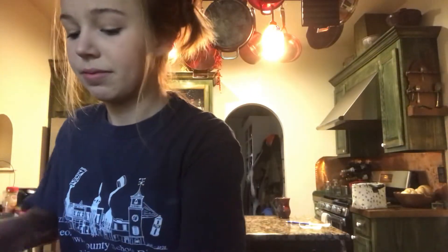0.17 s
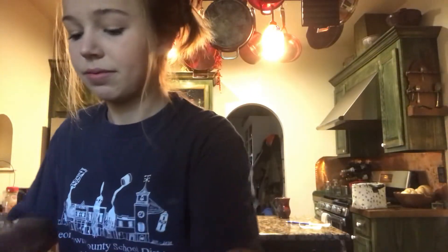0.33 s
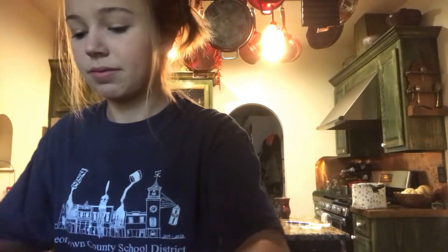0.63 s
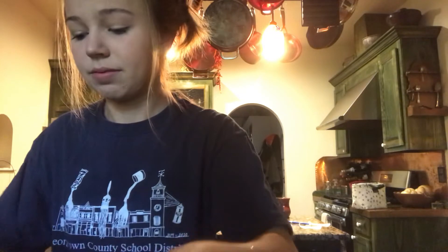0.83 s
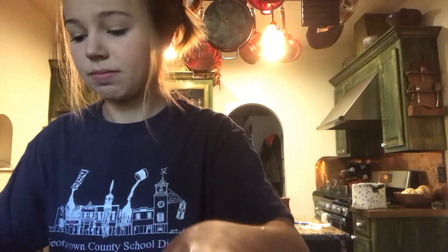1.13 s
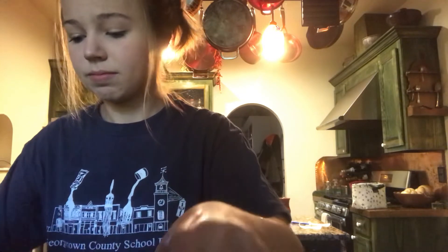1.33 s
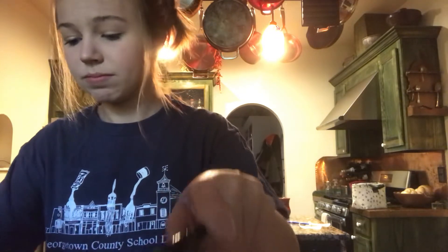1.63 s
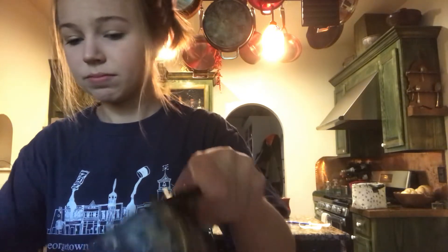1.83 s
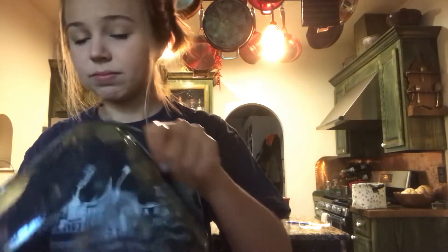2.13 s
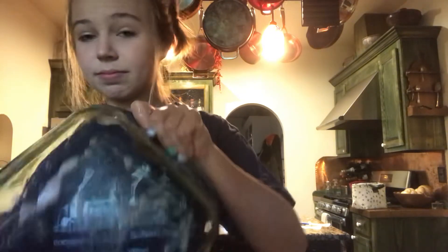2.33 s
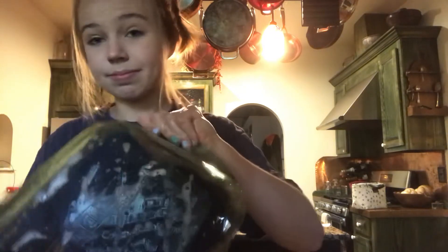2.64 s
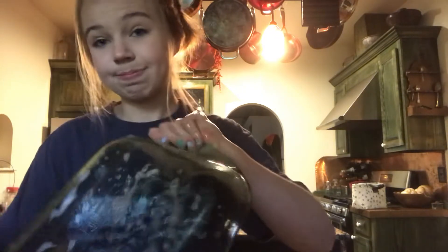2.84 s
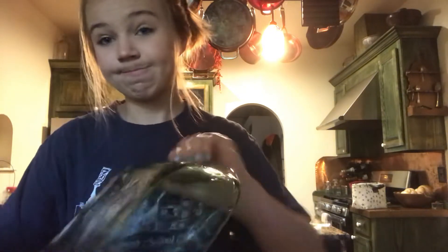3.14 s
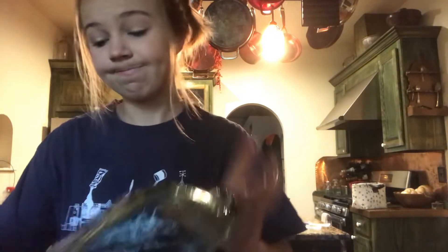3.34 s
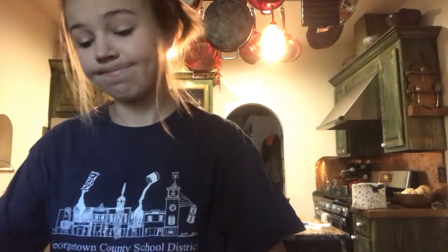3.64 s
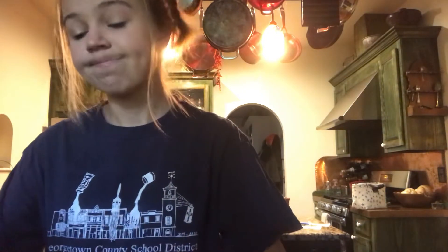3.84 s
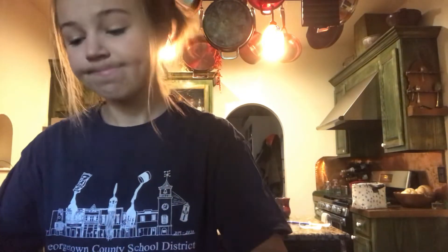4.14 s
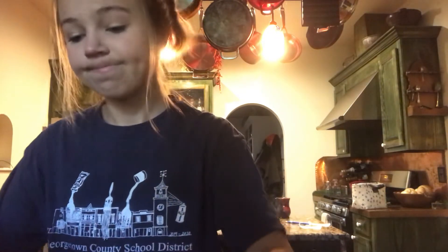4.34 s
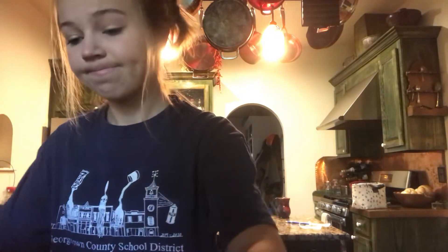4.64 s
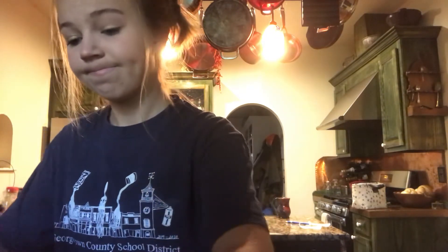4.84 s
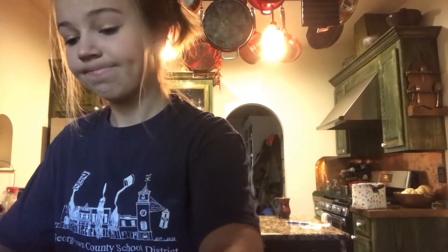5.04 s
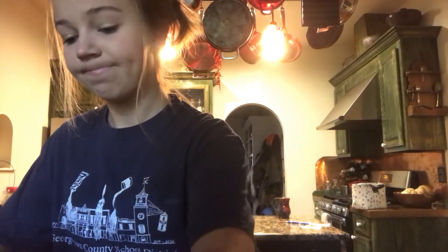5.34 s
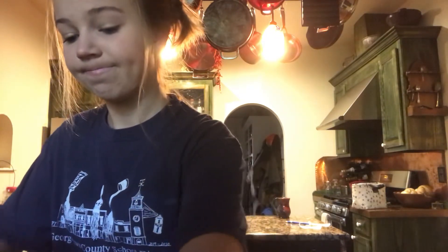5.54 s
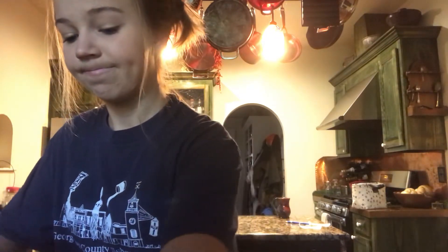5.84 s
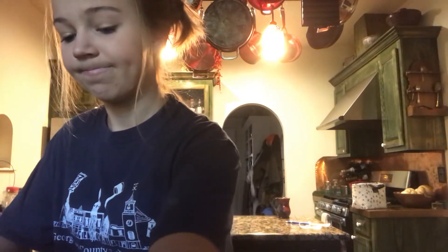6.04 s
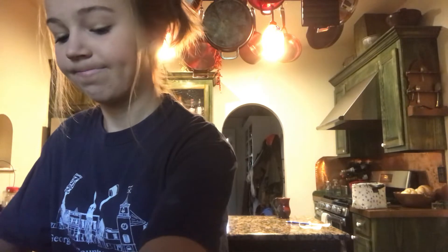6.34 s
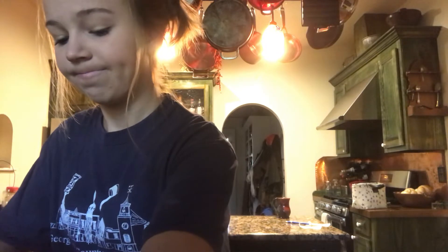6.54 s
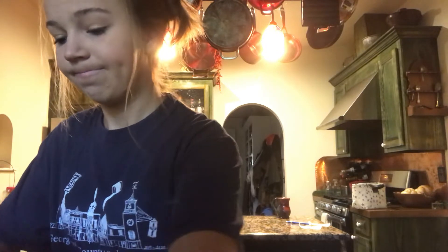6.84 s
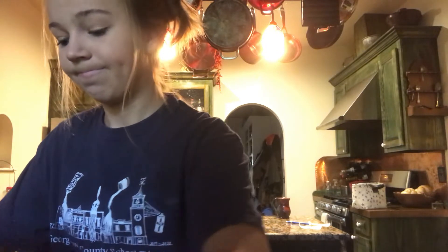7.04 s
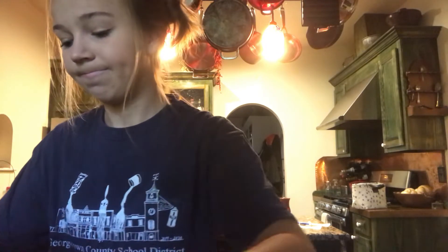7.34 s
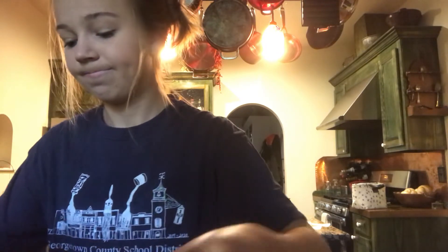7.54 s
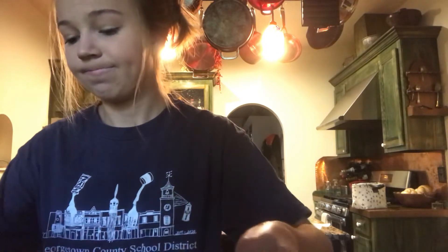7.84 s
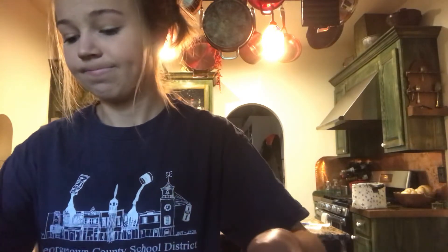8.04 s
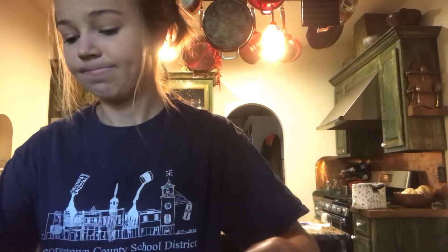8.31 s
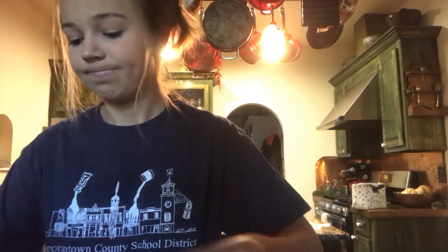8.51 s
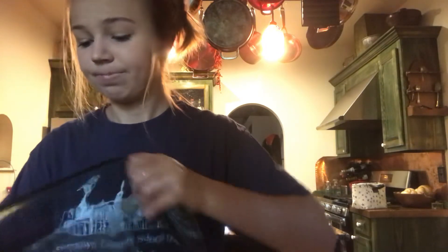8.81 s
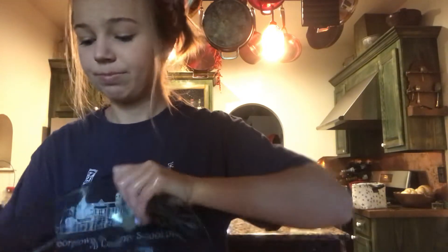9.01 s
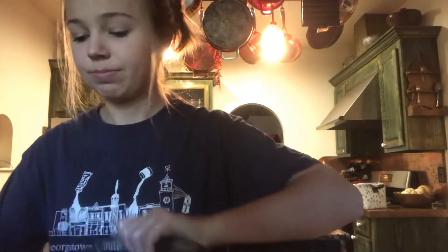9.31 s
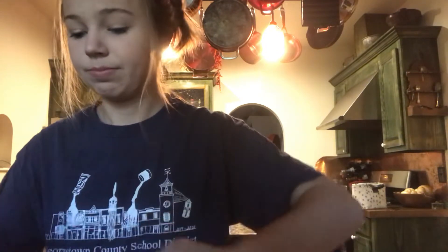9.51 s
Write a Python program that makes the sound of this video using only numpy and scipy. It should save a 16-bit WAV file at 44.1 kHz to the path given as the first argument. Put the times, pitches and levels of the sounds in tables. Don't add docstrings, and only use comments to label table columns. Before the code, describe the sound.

Washing a glass baking dish under a running tap: hissing water, small gushes, bright drips, and a cluster of hard clunks on the metal basin.

```python
import sys
import numpy as np
from scipy import signal
from scipy.io import wavfile
from scipy.ndimage import uniform_filter1d

SR = 44100
rng = np.random.default_rng(int(sys.argv[2]) if len(sys.argv) > 2 else 0)


def invert_db(x):
    u = np.asarray(x, float) / 20
    return 10 ** u


def digitize_waveform(pressure):
    field = np.atleast_2d(pressure).T
    bounded = np.clip(field, -1, 1)
    quanta = np.round(bounded * 32767).astype(np.int16)
    wavfile.write(sys.argv[1], SR, quanta)


N = 426447

# f/Hz, level/dB, t60/s
SET_DOWN_MODES = [(82.4, -37, 0.54), (222, -17, 0.057), (269.5, -44.5, 0.67), (351, -38, 0.33),
                  (367, -18.5, 0.054), (439, -36, 0.19), (473, -31, 0.17), (548, -39, 0.18),
                  (650, -30.5, .06), (715, -42, 0.35), (796, -38, 0.054), (934, -34, 0.15), (960, -42, 0.3),
                  (1124, -27, 0.063), (1166, -40, .17), (1213, -22, 0.058), (1400, -25, 0.07),
                  (1673, -24, 0.06), (1750, -35, .14), (2612, -31, 0.097)]
PUT_BACK_MODES = [(86.5, -40.5, 0.46), (385, -52, .2), (480, -42, 0.21), (580, -35, 0.092),
                  (780, -51, 0.14), (1038, -39, 0.15), (1086, -38, 0.19), (1390, -40, 0.09),
                  (1440, -47, 0.26), (1470, -25, 0.1), (1620, -31, 0.072), (1790, -22, 0.03),
                  (2810, -23.5, 0.041), (3095, -25, 0.092), (3600, -26.5, 0.07), (3600, -42, 0.11)]
NUDGE_MODES = [(194, -36, 0.18), (257, -35, 0.17), (350, -23.5, 0.07), (484, -53, 0.14), (573, -47, 0.22),
               (740, -36.5, 0.51), (870, -23.5, 0.06), (1065, -39, 0.16), (1180, -44, 0.11),
               (1300, -52, 0.081), (1430, -63, 0.2), (1450, -46, .08), (1534, -52, 0.4), (1860, -32, 0.063),
               (2800, -41, 0.077)]
BANG_MODES = [(78, -28, 0.12), (233, -6, 0.026), (265, -35, 0.2), (402, -29, 0.26), (449, -21.5, 0.19),
              (485, -9.5, 0.07), (620, -32, 0.15), (735, -18.5, 0.54), (888, -19, 0.14), (1090, -43, .25),
              (1160, -15, 0.064), (1270, -7.5, 0.032), (1520, -27, 0.44), (1826, -37, 0.62),
              (1850, -12, 0.035), (2695, -17.5, 0.051), (2812, -32, 0.18), (3310, -24.5, 0.075)]
REBOUND_MODES = [(172, -32, 0.043), (400, -52, .2), (449, -33, 0.12), (485, -19.5, 0.12), (590, -46, .3),
                 (733, -37.5, 0.51), (855, -39, 0.18), (900, -29, 0.081), (1020, -49, 0.37),
                 (1230, -24.5, 0.075), (1400, -39, .14), (1710, -45, .18), (1890, -30, 0.11),
                 (1854, -41, 0.64), (2385, -38, 0.14)]
SETTLE_MODES = [(382, -47, 0.52), (449, -38, 0.12), (490, -21, 0.12), (590, -51, 0.27), (720, -29, 0.072),
                (890, -34, 0.1), (910, -39, 0.21), (1036, -54, 0.19), (1153, -41, 0.26), (1246, -35, 0.08),
                (1400, -49, 0.15), (1430, -54, 0.46), (1688, -49, 0.089), (1826, -43, 0.27),
                (3980, -44, 0.21)]
SCRUB_A_MODES = [(261, -41.5, 0.26), (394, -44, 0.39), (448, -27.5, 0.17), (486, -17, 0.076),
                 (556, -36, 0.22), (654, -44, 0.33), (735, -44, 0.26), (830, -9.5, 0.018), (950, -34, .1),
                 (1110, -40, 0.2), (1142, -39, 0.11), (1220, -13, 0.038), (1450, -25, 0.051),
                 (1680, -30, 0.059), (1750, -48, 0.13), (2377, -42, 0.15), (2540, -42, 0.12),
                 (2692, -52, 0.2), (2803, -40, 0.087)]
SCRUB_B_MODES = [(261, -47, 0.22), (397, -44, 0.23), (448, -31.5, 0.19), (487, -22.5, 0.086),
                 (566, -44, 0.23), (705, -48, 0.6), (823, -26.5, 0.044), (1088, -50, .25),
                 (1200, -47, 0.37), (1235, -22.5, 0.026), (1410, -50, .12), (1520, -45, .45),
                 (1680, -43, 0.2), (2370, -50, .12), (2610, -49, .08), (2800, -38.5, 0.14)]
SCRUB_C_MODES = [(256, -47, 0.26), (399, -38, 0.25), (445, -27.5, 0.18), (479, -14.5, 0.053),
                 (518, -36, .12), (735, -38.5, 0.53), (818, -21.5, 0.071), (934, -22, 0.057),
                 (1084, -51, .25), (1197, -10.5, 0.039), (1227, -38, .14), (1390, -30, 0.067),
                 (1523, -35, 0.34), (1660, -24.5, 0.13), (2400, -43, 0.11), (2520, -43, .15),
                 (2670, -42, .07), (2800, -26, 0.16), (3070, -38, 0.13), (3580, -38, 0.16)]
# t/s, contact/s, free ringing until damped/s, clatter level/dB, clatter t60/s
KNOCKS = [
    (0.647, 0.0012, 0.36, -38.5, 0.45),
    (3.733, 0.0014, .3, -35.5, 0.24),
    (4.601, 0.0019, 0.18, -35.5, 0.36),
    (4.8149, 0.0016, 0.089, -27, 0.3),
    (4.984, 0.0011, 0.17, -37, 0.15),
    (5.027, 0.002, 0.06, -39.5, 0.39),
    (5.48, 0.0019, .3, -34, 0.16),
    (6.0512, 0.00092, 0.33, -45, 0.42),
    (6.554, 0.00067, 0.27, -35.5, 0.39),
]
DISH_MODES = [262, 394, 449, 485, 734, 888, 1185, 1532, 1670, 1826, 2803, 3078]
# t/s, peak level/dB, f/Hz
TICKS = [(.174, -32, 7470), (0.1965, -26, 5540), (.629, -33, 5520), (.648, -28, 5940), (.9098, -31, 4920),
         (.931, -29, 8200), (1.279, -34, 9000), (1.321, -29, 9000), (0.3347, -30, 3370),
         (0.4473, -32, 4520), (0.9587, -25, 8550), (1.1942, -30, 4500), (1.266, -28, 5400),
         (1.29, -25, 3900), (1.4125, -23, 4140), (1.9246, -43, 5000), (2.392, -28, 3530),
         (2.8729, -28, 4160), (3.114, -35, 5190), (3.501, -33, 5950), (3.637, -32, 4320),
         (3.6646, -31, 6650), (3.967, -31, 4220), (4.01, -31, 5420), (4.351, -35, 5220), (4.806, -30, 8000),
         (4.961, -31, 3680), (4.256, -25, 6300), (5.014, -29, 4930), (5.13, -19.5, 5600),
         (5.337, -31, 4170), (5.3698, -26.5, 3380), (5.402, -28, 5370), (5.1627, -33, 4580),
         (5.481, -26, 6200), (5.554, -29, 4240), (5.597, -27.5, 4180), (6.1474, -31, 6610),
         (6.556, -30, 6440), (7.176, -37, 8500), (7.201, -33, 5440), (7.72, -32, 3600), (8.321, -32, 5400),
         (6.3679, -30, 6710), (7.1102, -17, 4800), (7.6287, -29, 6160), (7.654, -29, 4530),
         (7.7079, -27, 12000), (7.911, -27, 5550), (8.2864, -32, 1560), (8.4716, -36, 4320),
         (8.5909, -30, 3470), (8.635, -22, 6440), (9.371, -21, 4600)]
# t/s, peak level/dB, f/Hz, t60/s
PLOPS = [(1.036, -41, 1135, 0.044), (1.158, -41, 1115, 0.11), (1.364, -38, 650, 0.034),
         (2.072, -42, 1250, 0.048), (2.073, -8, 2980, 0.0095), (2.104, -42, 587, 0.071),
         (2.208, -34.5, 1110, 0.049), (2.222, -48, 480, 0.12), (2.597, -31.5, 380, 0.018),
         (2.599, -32.5, 250, 0.021), (1.212, -36, 3310, .05), (1.24, -36, 3250, .04),
         (5.575, -42, 830, .04), (5.592, -40, 1200, .04), (5.6, -40, 507, .04), (7.192, -36, 2500, 0.034),
         (3.463, -32, 3250, 0.044), (5.577, -27.5, 484, 0.036), (7.669, -39.5, 1220, 0.036),
         (8.229, -43, 560, 0.048), (8.285, -31, 1260, 0.063), (8.469, -35, 1400, 0.065),
         (8.58, -34.5, 1330, 0.035)]
# t/s, peak level/dB, f/Hz, t60/s
THUDS = [(0.961, -37, 108, 0.063), (1.279, -49, 193, 0.074), (2.096, -33, 167, 0.036),
         (4.043, -44, 210, 0.11), (4.095, -46, 242, 0.12), (7.278, -29, 104, 0.031),
         (8.23, -25, 211, 0.028)]
# t/s, length/s, level/dB, centre f/Hz
SLOSHES = [(0.894, 0.086, -51.5, 953.7), (1.1, 0.044, -68, 1900), (1.187, 0.063, -46.5, 3300),
           (1.902, .025, -52, 2800), (2.02, 0.17, -53, 1070), (2.204, 0.035, -39.5, 2520),
           (2.206, 0.073, -45.5, 1030), (4, 0.28, -68, 259.3), (4.017, 0.041, -53, 1300),
           (5.571, 0.064, -52, 487), (7.157, 0.23, -60.5, 610), (7.188, 0.025, -45, 2400),
           (8.212, 0.052, -56, 900), (8.448, 0.046, -43, 4104), (8.594, 0.072, -63, 1900)]
# t/s, flow level/dB, lift level/dB
FLOW = [(0.0, -45, -1), (0.83, -46.5, -1), (0.99, -40.5, 0.5), (1.2, -41.5, 0.5), (1.45, -44.5, -0.5),
        (1.86, -45.5, 0), (1.97, -37, -2), (2.3, -38.5, -1), (2.55, -41.5, 0.5), (3.42, -42.5, 0.5),
        (4.28, -41.5, -4.5), (4.6, -41, -1), (5.47, -42, -2.5), (5.76, -46.5, -3), (6.6, -50, -2.5),
        (7.35, -40, -0.5), (7.95, -46, 0), (9.67, -44.5, -1)]
# t/s, flow change/dB, lift change/dB,
# length/s
GUSHES = [(2.102, 0, 2, 0.19), (3.383, 2.5, 0.5, 0.15), (3.5, 0, -1.5, 0.39), (3.654, 3, -0.5, 0.41),
          (4.547, 3, -0.5, 0.19), (4.826, 3.5, -2, 0.024), (5.365, 1.5, 1, 0.15), (6.3, 3.5, 1.5, 0.63),
          (6.856, 4, -14, 0.16), (8.31, 3, -0.5, 0.62), (8.62, 6.5, 1.5, 0.35), (8.952, 3.5, 1.6, 0.78)]
# f/Hz, density level/dB
SPRAY_SPECTRUM = [(880, -21), (1500, -3.5), (2140, -11.5), (2940, -10.5), (3480, -1), (6370, 0.5),
                  (9470, -4.5), (10300, -5.5), (14000, -10.5), (16000, -25)]
# t/s, share/0-1
DISH_MIRROR = [(0, .04), (3.4, .04), (3.8, .12), (4.5, .04), (5.4, .08), (5.7, .2), (6.2, .3), (6.7, .26),
               (6.95, .04), (9.67, .04)]
# f/Hz, density level/dB
STREAM_SPECTRUM = [(15, -44), (25, -6), (58, -2), (108, -3.5), (516, -12.5), (575, -13), (754, -17.5),
                   (1020, -9.5), (1130, -28.5), (1560, -4), (1890, -6.5), (2910, -12), (3520, -12.5),
                   (6560, -8), (14400, -13.5), (16000, -19)]
# f/Hz, width/Hz, level/dB
BASIN_HUM = [(592, 53, -69), (972, 96, -68), (1449, 57, -59.5), (1538, 150, -55), (2315, 20, -66),
             (2555, 84, -64), (2784, 380, -58.5), (3932, 63, -61), (4420, 120, -63.5), (4690, 210, -66),
             (6580, 300, -74), (9220, 280, -68)]
# f/Hz, width/Hz, share removed/0-1
HOUSING_DIPS = [(3500, 810, 0.19), (7900, 1670, 0.38), (10430, 810, 0.47), (11680, 1100, 0.3)]

STRIKE_SCATTER = .2
TICK_T60_S, TICK_WIDTH = 0.031, 0.41
HARD_TICK_DB, HARD_SHORTENS = -30, 0.45
STRAY_TICKS, STRAY_DB, STRAY_SPREAD_DB = 110, -37, 2.5
STRAY_HZ, STRAY_OCTAVES = 8000, .4
GUSH_RISE_S = 0.059
MIRROR_LAG_S = .000385
STREAM_DB = -49.5
KITCHEN_T60_S, KITCHEN_DB, WATER_ROOM_DB = .26, -17, -12.5
WALL_CUT_HZ = 3700
LOW_CUT_HZ, TOP_HZ, PEAK_TOP = 47, 15720, .85


def knocks():
    out, t = np.zeros(N), np.arange(SR // 2) / SR
    rings = [SET_DOWN_MODES, PUT_BACK_MODES, NUDGE_MODES, BANG_MODES, REBOUND_MODES, SETTLE_MODES,
             SCRUB_A_MODES, SCRUB_B_MODES, SCRUB_C_MODES]
    dull = signal.butter(6, [200, 1800], "band", fs=SR, output="sos")
    bright = signal.butter(4, [2300, 4600], "band", fs=SR, output="sos")
    for (s, contact, free, clatter_db, tail), modes in zip(KNOCKS, rings):
        hz, db, t60 = np.transpose(modes)[:, :, None]
        hz = on_dish(hz, t60)
        scatter = STRIKE_SCATTER * rng.uniform(0, 2 * np.pi, (len(modes), 1))
        phase = np.pi * np.arange(len(modes))[:, None] + scatter
        swell = 1 - np.exp(-t * hz * hz / 160)
        partials = swell * invert_db(db - 60 * t / t60) * np.sin(2 * np.pi * hz * t + phase)
        ring = partials.sum(axis=0)
        rattle = rms_one(signal.sosfilt(dull, rng.standard_normal(len(t))))
        crack = rms_one(signal.sosfilt(bright, rng.standard_normal(len(t))))
        clatter = invert_db(clatter_db - 60 * t / tail) * rattle
        clatter += invert_db(clatter_db - 4 - 60 * t / 0.12) * crack
        choke = invert_db(-np.clip(60 * (t - free) / 0.097, 0, 17))
        add(out, s, (1 - np.exp(-t / contact)) * (choke * ring + clatter))
    return out


def on_dish(hz, t60):
    hz = hz.copy()
    for own in DISH_MODES:
        near = np.abs(np.log(hz / own)) < .035
        if near.any():
            hz[np.argmax(near * t60)] = own
    return hz


def ticks():
    out, t = np.zeros(N), np.arange(SR // 16) / SR
    when = rng.uniform(0, N / SR, STRAY_TICKS)
    strength, pitch = rng.standard_normal((2, STRAY_TICKS))
    stray_db = STRAY_DB + STRAY_SPREAD_DB * strength
    stray_hz = STRAY_HZ * 2 ** (STRAY_OCTAVES * np.clip(pitch, -2, 2))
    for s, db, hz in TICKS + list(zip(when, stray_db, stray_hz)):
        t60 = TICK_T60_S * invert_db(-HARD_SHORTENS * max(db - HARD_TICK_DB, 0))
        width = TICK_WIDTH * hz
        burst = resonate(rng.standard_normal(len(t)), hz, width)
        puff = rms_one(resonate(burst, hz, 2.0 * width))
        ring = np.sin(2 * np.pi * hz * t)
        envelope = invert_db(db - 1.5 - 60 * t / t60) * (1 - np.exp(-t / .0012))
        add(out, s, envelope * (.75 * puff + .45 * ring))
    return out


def drops(events, spread, rise, swell, gain_db):
    out, t = np.zeros(N), np.arange(SR // 6) / SR
    for s, db, hz, t60 in events:
        off, phase = rng.standard_normal(2)
        turns = 2 * np.pi * hz * (t + rise * t * t)
        second = np.sin(np.exp(spread * np.tanh(off)) * turns + 3 * phase)
        envelope = invert_db(db + gain_db - 60 * t / t60) * (1 - np.exp(-t / swell))
        add(out, s, envelope * (np.sin(turns) + .45 * second))
    return out


def sloshes():
    out, lumpy = np.zeros(N), rng.standard_normal(N) * invert_db(3.1 * drift(25))
    for s, length, db, hz in SLOSHES:
        piece = lumpy[round(s * SR):round((s + length) * SR)]
        wash = rms_one(resonate(resonate(piece, hz, 0.82 * hz), hz, 1.3 * hz))
        add(out, s, invert_db(db) * np.hanning(len(piece)) ** 0.12 * wash)
    return out


def splash():
    t = np.arange(N) / SR
    when, flow, lift = np.transpose(FLOW)
    level_db = np.interp(t, when, flow)
    spray_db = np.interp(t, when, lift)
    for s, flow_db, lift_db, length in GUSHES:
        gush = np.interp(t, [s - GUSH_RISE_S, s, s + length], [0, 1, 0])
        level_db = level_db + flow_db * gush
        spray_db = spray_db + lift_db * gush
    sizes = invert_db(3.5 * np.minimum(rng.exponential(1, (2, N)), 5)) * rng.choice([-1, 1], (2, N))
    per_second = 4000 * invert_db(3.0 * flicker(25))
    clicks = sizes * (rng.random((2, N)) < per_second / SR)
    white = 0.5 * rms_one(clicks) + 1.0 * rng.standard_normal((2, N))
    tilt_db = 3.5 * (spray_db - spray_db.mean())
    spray = banded_noise(SPRAY_SPECTRUM, white, shared_db=1.0, own_db=1.63, tilt_db=tilt_db)
    return invert_db(level_db - 1.5) * spray


def mirror(x):
    share = np.clip(np.interp(np.arange(N) / SR, *np.transpose(DISH_MIRROR)), 0, .9)
    treble = signal.butter(1, [3200, 10500], "band", fs=SR, output="sos")
    echo = signal.sosfiltfilt(treble, np.roll(x, round(MIRROR_LAG_S * SR)))
    return (x - share * echo) / np.sqrt(1 + share ** 2)


def stream():
    hiss = banded_noise(STREAM_SPECTRUM, rng.standard_normal((2, N)), shared_db=1.0, own_db=0.7)
    patter = rng.standard_normal(N) * invert_db(2.4 * drift(19))
    hum = np.zeros(N)
    for hz, width, db in BASIN_HUM:
        hum += invert_db(db) * rms_one(resonate(resonate(patter, hz, width), hz, 1.16 * width))
    return invert_db(STREAM_DB) * hiss + hum


def kitchen(x, cut_hz):
    t = np.arange(SR // 2) / SR
    echoes = rng.standard_normal(len(t)) * invert_db(-60 * t / KITCHEN_T60_S) * (t > .004)
    echoes = signal.sosfilt(signal.butter(1, cut_hz, fs=SR, output="sos"), echoes)
    return signal.fftconvolve(x, echoes / np.linalg.norm(echoes))[:N]


def banded_noise(spectrum, white, shared_db, own_db, tilt_db=0):
    out, together = 0, flicker(34)
    edges = 24 * 2 ** np.arange(0, 9.6, .5)
    for k, (low, high) in enumerate(zip(edges, edges[1:])):
        band_pass = signal.butter(2, [low, high], "band", fs=SR, output="sos")
        band = signal.sosfilt(band_pass, white[k % 2])
        hz = np.sqrt(low * high)
        lift_db = tilt_db * np.clip(np.log2(hz / 7000), 0, 1)
        flicker_db = shared_db * together + own_db * flicker(15.7)
        out = out + band * invert_db(at_hz(spectrum, hz) + lift_db + flicker_db)
    return rms_one(out)


def flicker(rate):
    chance = drift(rate)
    return rms_one(chance - uniform_filter1d(chance, SR // 22))


def drift(rate):
    r = np.exp(-80 * np.pi * rate / SR)
    slow = signal.lfilter([1], [1, -2 * r, r * r], rng.standard_normal(N // 40 + 2002))[2000:]
    return np.interp(np.arange(N) / 40, np.arange(len(slow)), rms_one(slow))


def resonate(x, hz, width_hz):
    r = np.exp(-np.pi * width_hz / SR)
    poles = [1, -2 * r * np.cos(2 * np.pi * hz / SR), r * r]
    return signal.lfilter([(1 - r * r) / 2, 0, (r * r - 1) / 2], poles, x)


def at_hz(points, hz):
    f, db = np.transpose(points)
    return np.interp(np.log(hz), np.log(f), db)


def rms_one(x):
    return x / np.sqrt(np.mean(x ** 2) + 1e-20)


def add(out, s, piece):
    i = round(s * SR)
    out[i:i + len(piece)] += piece[:N - i]


def scene():
    near = knocks() + ticks() + sloshes()
    near += drops(PLOPS, spread=.12, rise=.7, swell=.002, gain_db=1.5)
    near += drops(THUDS, spread=.2, rise=.3, swell=.005, gain_db=1.5)
    water = mirror(stream() + splash())
    water += invert_db(WATER_ROOM_DB) * kitchen(water, cut_hz=14200)
    return (near + invert_db(KITCHEN_DB) * kitchen(near, WALL_CUT_HZ) + water)[None]


def low_pass(x):
    return signal.sosfilt(signal.butter(12, 16250, fs=SR, output="sos"), x)


def record(dry):
    x = signal.sosfilt(signal.butter(4, LOW_CUT_HZ, "high", fs=SR, output="sos"), dry)
    x = PEAK_TOP * np.tanh(x / PEAK_TOP)
    for hz, width_hz, share in HOUSING_DIPS:
        x = x - share * resonate(x, hz, width_hz)
    x = signal.sosfilt(signal.ellip(12, .5, 80, TOP_HZ, fs=SR, output="sos"), x)
    return low_pass(x)


dry = scene()
out = record(dry)
digitize_waveform(out)
```